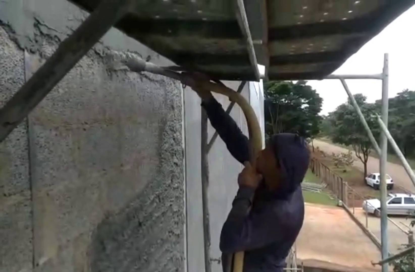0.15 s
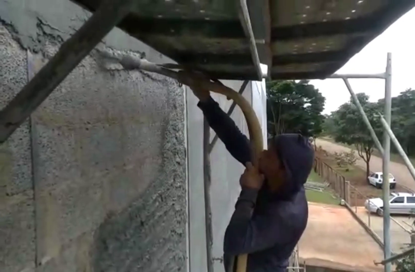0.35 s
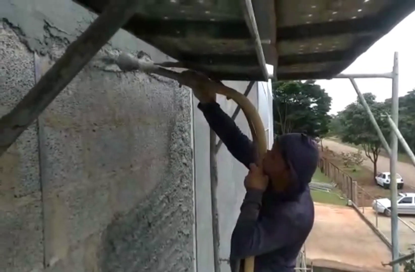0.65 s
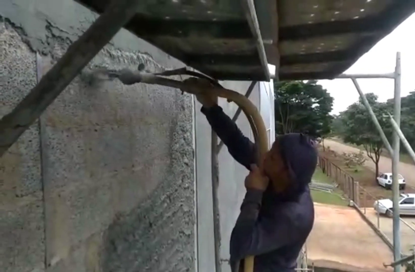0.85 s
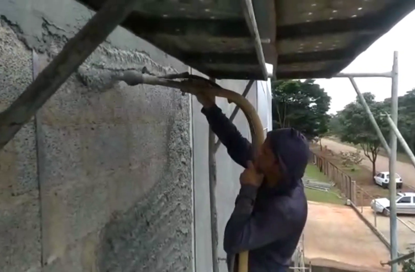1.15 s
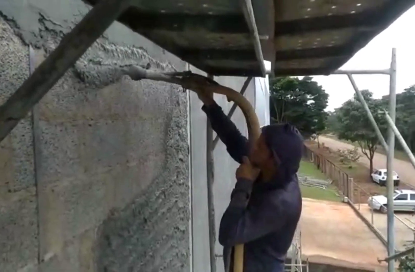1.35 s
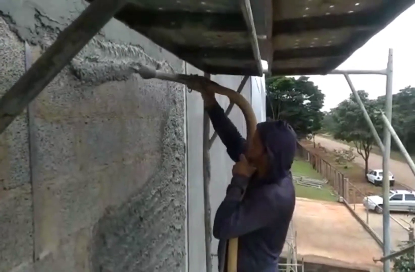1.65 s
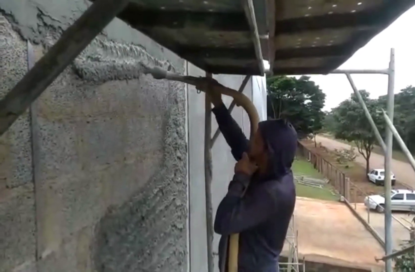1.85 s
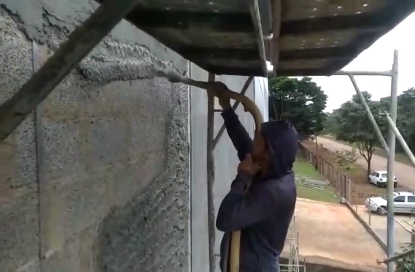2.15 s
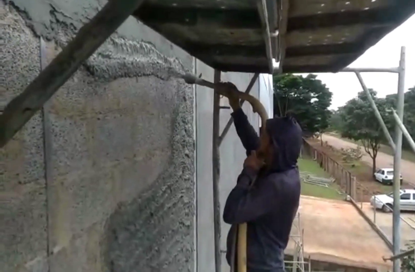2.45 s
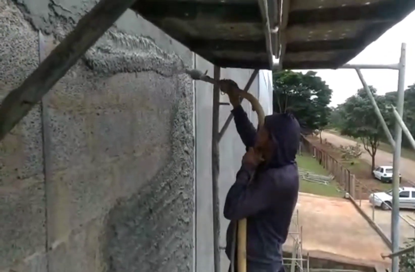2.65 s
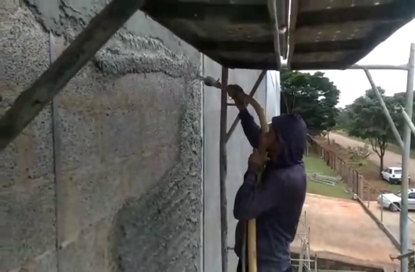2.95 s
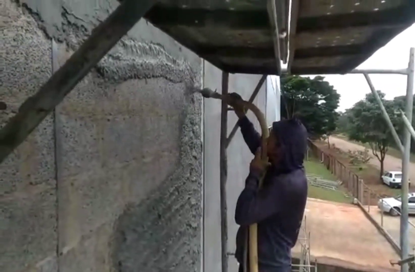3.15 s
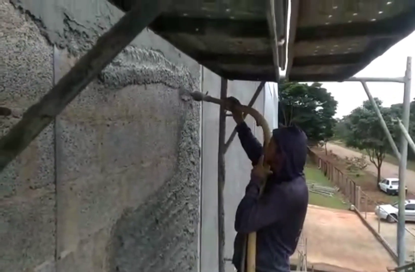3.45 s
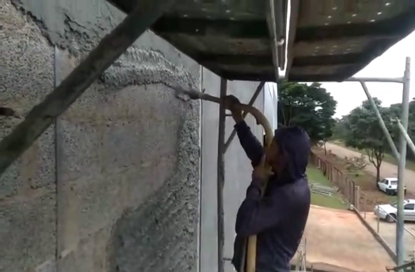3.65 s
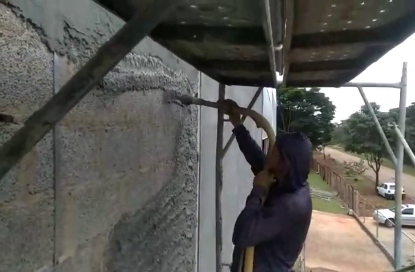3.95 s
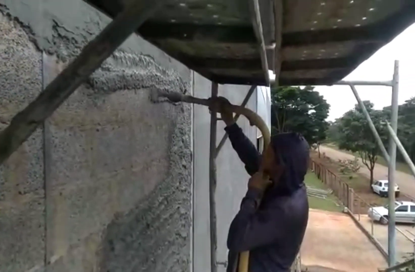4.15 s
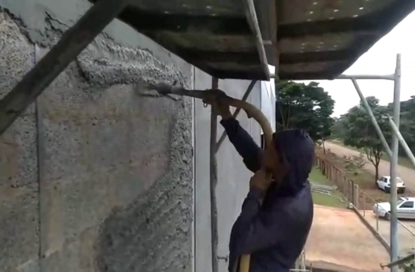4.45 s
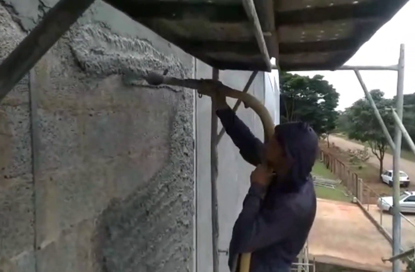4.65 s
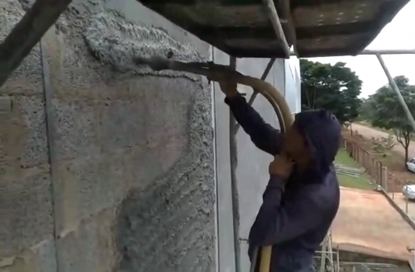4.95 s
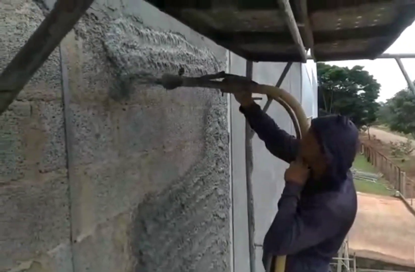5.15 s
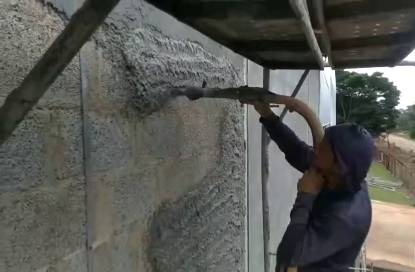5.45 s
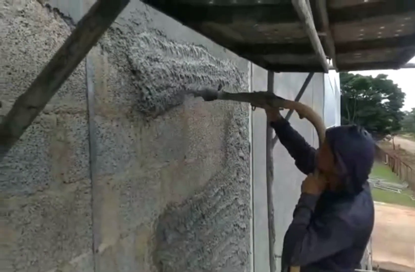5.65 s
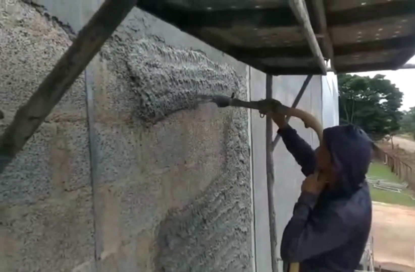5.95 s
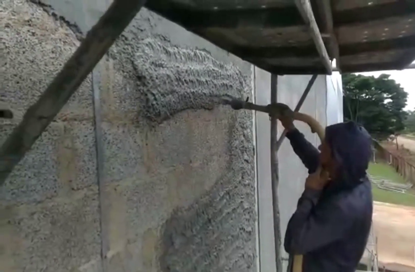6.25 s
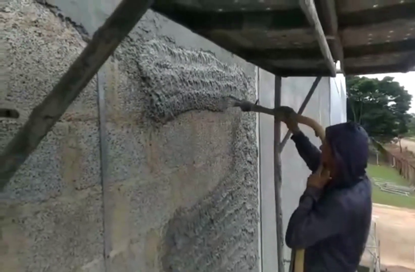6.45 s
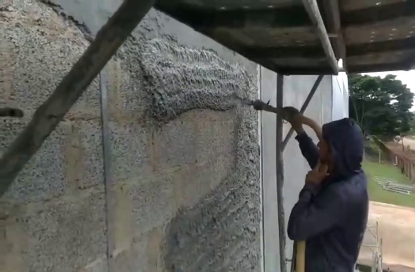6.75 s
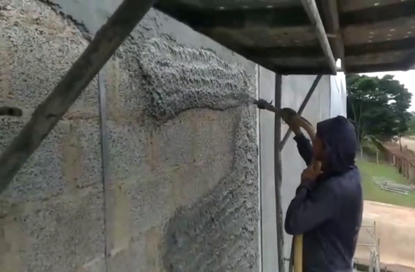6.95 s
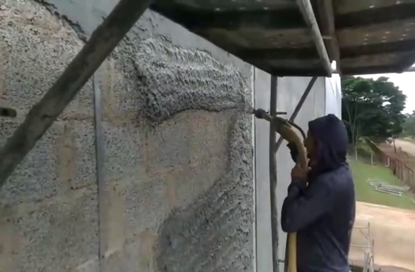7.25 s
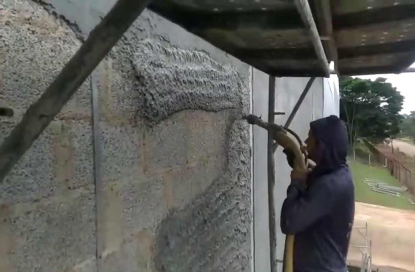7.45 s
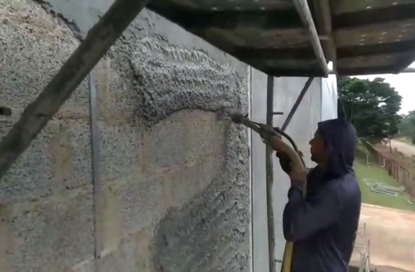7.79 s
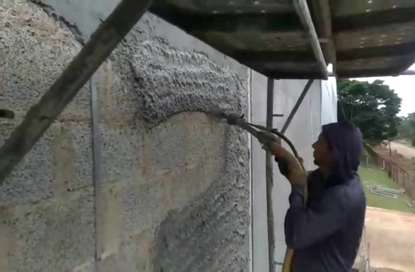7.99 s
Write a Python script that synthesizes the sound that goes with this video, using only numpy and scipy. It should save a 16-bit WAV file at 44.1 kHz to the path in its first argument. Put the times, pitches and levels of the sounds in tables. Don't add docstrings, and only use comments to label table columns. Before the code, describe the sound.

A mortar spray gun hisses harshly without pause, its bright flickering air jet knocked through by rapid hollow pops and low gurgling, outdoors and close.

```python
import sys
import numpy as np
from scipy import signal
from scipy.fft import rfft, irfft, next_fast_len
from scipy.io import wavfile
from scipy.ndimage import uniform_filter1d

SR = 44100
rng = np.random.default_rng(int(sys.argv[2]) if len(sys.argv) > 2 else 0)


def ratio(d):
    e = np.asarray(d, float) / 20
    return 10 ** e


def transcribe(signal):
    frames = np.atleast_2d(signal).T
    limited = np.clip(frames, -1, 1)
    pcm = np.round(limited * 32767).astype(np.int16)
    wavfile.write(sys.argv[1], SR, pcm)


N = 358245
T = np.arange(N) / SR
SIZE = next_fast_len(N)
HZ = np.maximum(np.arange(SIZE // 2 + 1) * SR / SIZE, 1)
HOP = SR // 2000

# time in seconds, peak level in dB.
SPITS = [(0.035, -11), (0.1092, -7), (0.1585, -16), (0.2154, -20), (0.3087, -18), (0.381, -7),
         (0.4409, -17), (0.4683, -17), (0.496, -1), (0.5252, -7), (0.6565, -1), (0.7028, -8),
         (0.7532, -13), (0.7951, -7), (0.8175, -7), (0.8415, -8), (0.9163, -12), (1.038, -3),
         (1.2022, -9), (1.3284, -11), (1.3942, -14), (1.4875, -12), (1.509, -10), (1.536, 2),
         (1.5758, -12), (1.682, -2), (1.7194, -5), (1.7509, -10), (1.9614, -4), (2.0542, -10),
         (2.1325, -3), (2.16, -5), (2.1824, -6), (2.2278, -2), (2.2613, 0), (2.2857, -22),
         (2.3371, -7), (2.4204, -9), (2.469, -5), (2.5117, -8), (2.5394, -1), (2.6868, -14),
         (2.737, -4), (2.7816, -12), (2.8933, -11), (2.9397, -11), (3.0126, -10), (3.0609, -6),
         (3.3767, -12), (3.4096, -9), (3.4366, -12), (3.5184, -15.5), (3.5603, -15), (3.6476, -14),
         (3.711, -20), (3.7514, 7), (3.8, -9), (3.8422, -4), (3.923, 1), (4.0432, -11),
         (4.0444, -15), (4.1063, -1), (4.1541, -18), (4.1811, -19), (4.2385, -6), (4.3055, -1),
              (4.3372, -9), (4.4045, -10), (4.4507, -8), (4.4983, -10), (4.5258, -12), (4.6196, -5),
              (4.6706, -12), (4.7134, 1), (4.7582, -13), (4.8495, -14), (4.873, -9), (4.9438, -13),
              (5.0221, -5), (5.0526, -5), (5.0885, 0), (5.1914, -5), (5.236, -13), (5.287, -9), (5.32, -1),
              (5.372, -11), (5.4098, -15), (5.4606, -15), (5.4886, -11), (5.557, -7), (5.577, -5),
              (5.6098, -9), (5.76, -12), (5.789, -8), (5.8293, -12), (5.9214, 1), (5.949, -7), (5.976, -11),
              (6.0937, -9), (6.2, -10), (6.2274, -6), (6.3935, -8.5), (6.426, -13), (6.5078, -13),
              (6.5347, -9), (6.5971, -11), (6.643, -15), (6.7088, -6), (6.8689, -9), (7.0835, -12),
              (7.1164, -13), (7.1553, -11), (7.1772, -12), (7.735, -16), (7.8318, 0), (7.8767, -6),
              (7.958, -8), (8.0283, -14), (8.0562, -14), (8.0867, -10)]
# time in seconds, peak level in dB.
POPS = [(0.021, -20), (0.081, -16), (0.186, -21), (0.207, -12.5), (0.257, -14.5), (0.29, -12.5),
        (0.346, -13), (0.458, -13), (0.48, -14), (0.509, -16), (0.639, -12.5), (0.781, -21),
        (0.874, -16), (0.909, -17), (0.937, -16), (1.053, -17), (1.087, -14.5), (1.143, -11),
        (1.162, -13), (1.218, -18), (1.32, -12.5), (1.347, -14.5), (1.428, -20), (1.478, -29),
        (1.5, -23), (1.527, -16), (1.552, -17), (1.67, -24), (1.734, -16), (1.76, -19), (1.819, -17),
        (1.846, -11.5), (1.888, -13.5), (1.918, -12.5), (1.955, -18), (1.991, -18), (2.112, -16),
        (2.33, -17), (2.38, -24), (2.552, -18), (2.589, -13), (2.623, -26), (2.675, -15),
        (2.766, -16), (2.793, -14), (2.862, -15.5), (3.042, -15), (3.109, -12.5), (3.171, -12),
        (3.195, -16.5), (3.354, -29), (3.401, -23), (3.447, -25), (3.603, -15), (3.687, -12),
        (3.793, -21), (3.87, -24), (3.914, -14.5), (3.981, -14), (4.054, -25),
        (4.054, -32), (4.097, -13), (4.175, -15), (4.249, -13.5), (4.296, -15), (4.375, -16),
             (4.396, -18), (4.44, -16), (4.49, -12.5), (4.519, -17), (4.549, -26), (4.594, -14.5),
             (4.693, -16), (4.752, -17), (4.819, -15.5), (4.933, -15.5), (4.989, -15), (5.065, -28),
             (5.121, -24), (5.222, -40), (5.269, -16), (5.354, -13), (5.423, -15), (5.471, -17),
             (5.567, -23), (5.598, -16), (5.637, -19), (5.771, -15), (5.814, -15), (5.851, -14),
             (5.883, -12.5), (5.908, -13), (5.989, -16), (6.057, -16), (6.185, -26), (6.236, -14.5),
             (6.282, -15), (6.377, -17), (6.412, -18), (6.494, -15.5), (6.585, -13), (6.722, -26),
             (6.799, -13.5), (6.849, -15), (6.887, -18), (6.92, -20), (7.253, -27), (7.291, -19),
             (7.407, -14), (7.475, -15.5), (7.499, -11), (7.543, -25), (7.695, -22), (7.726, -11),
             (7.777, -19), (7.823, -26), (7.861, -19), (7.89, -20), (7.945, -17.5), (8.072, -13.5)]
# time in seconds, level in dB.
PRESSURE = [(0, -24.5), (.5, -24), (1, -24), (1.5, -25), (2, -25.5), (2.5, -25), (3.1, -25.5), (3.6, -25),
            (4.2, -25), (4.8, -24), (5.3, -24), (6, -25), (6.8, -24), (7.4, -24.5), (8.12, -25)]
# time in seconds, hiss centre in Hz, left minus right level in dB.
SWEEP = [(0.0, 6080, -5.5), (0.57, 5950, -5), (0.97, 5420, -3), (1.83, 5640, -4), (2.01, 6300, -4.5),
         (3.28, 5840, -2.5), (3.39, 6460, -2.5), (4.27, 5770, -6), (4.95, 5240, -1), (5.15, 6330, -1),
         (5.43, 5830, -2), (5.7, 6540, -3), (6.04, 5520, -4.5), (7.49, 5480, -0.5), (7.67, 5830, -5),
         (7.73, 6700, -2.5), (8.05, 5640, -2), (8.12, 6400, -4.5)]
# frequency in Hz, left dB per Hz, right dB per Hz, correlation (-1 to 1).
JET_SPECTRUM = [(302, -4, -53, 0.67), (730, -11, -67, 1), (950, -4.5, -11.5, 0.31), (1340, -6, -19.5, 0.51),
                (2020, -3.5, -6, 0.32), (2085, -3.5, -14, -0.14), (2790, -4, -9, -0.53),
                (3960, -1.5, -5.5, -0.46), (4220, 2, -2.5, 0.57), (4710, -2, 3.5, -0.18),
                (7320, 0.5, 1.5, -0.02), (8020, 3, -5, 0.13), (9970, -3, -8.5, -0.075),
                (15600, -8, -23, 0.27)]
# time in seconds, lower lobe in Hz, upper lobe in Hz.
LOBES = [(0.0, 5250, 6640), (0.02, 5100, 6600), (0.77, 5340, 6700), (0.86, 5050, 6060), (1.06, 5100, 6520),
         (2.15, 5110, 6390), (2.4, 5380, 6200), (3.6, 5170, 6900), (4.16, 5000, 6100), (4.84, 4840, 6900),
         (5.25, 4640, 6660), (5.4, 5490, 6350), (5.47, 4800, 6340), (5.67, 5030, 7060), (5.99, 4940, 6410),
         (6.65, 5240, 6370), (7.3, 4860, 6700), (8.12, 5240, 6560)]
# time in seconds, level in dB.
LOAD = [(0.0, -30.5), (0.25, -31.5), (1.79, -30), (1.83, -31), (2.01, -30.5), (3.21, -32), (3.23, -32.5),
        (3.6, -30), (5.79, -32), (5.9, -29.5), (6.02, -31.5), (8.12, -30.5)]
# frequency in Hz, width in Hz, level in dB.
BARREL_MODES = [
    (117.4, 57, -8),
    (213, 86, -6),
    (371, 43, -4.5),
    (513, 82, 1.5),
    (728, 340, -6.5),
    (1126, 750, -15.5),
]
# time in seconds, factor on low modes, factor on mouth modes.
FILL = [(0, 1.006, 0.99), (1.4, 1.03, 1.06), (2.3, 1.01, 0.97), (3.3, 1.015, 1), (4, 1.013, 0.97),
        (5, 0.98, 1.02), (6, 0.95, 1.03), (7, 1.05, 0.95), (7.5, 1.05, 0.95), (8.12, 1.07, 0.98)]
# time in seconds, low mode in Hz, middle mode in Hz, upper mode in Hz.
SHEET_MODES = [(0.0, 708, 1160, 2010), (0.04, 677, 1140, 1770), (0.41, 684, 1230, 1790),
               (0.93, 690, 1145, 1900), (1.13, 720, 1270, 1720), (1.42, 698, 1160, 1900),
               (5.34, 690, 1140, 1880), (5.43, 670, 1270, 1710), (5.5, 690, 1140, 1920),
               (5.86, 670, 1100, 2000), (6.99, 665, 1190, 1920), (7.3, 665, 1190, 1650),
               (7.35, 680, 1190, 1920), (7.96, 639, 1150, 1970), (8.07, 655, 1130, 1810),
               (8.12, 676, 1230, 1980)]
# time in seconds, frequency in Hz.
POCKET = [(0, 450), (1.4, 447), (2.3, 467), (3.3, 501), (4, 490), (5, 450), (6, 460), (7, 508), (7.5, 530),
          (8.12, 496)]
# time in seconds, lag in ms.
REACH = [(0.0, 2.23), (1.3, 2.14), (2.3, 2.26), (3.3, 2.24), (4.2, 2.28), (5.0, 2.31), (6.0, 2.3),
         (7.0, 2.25), (8.12, 2.33)]
# frequency in Hz, share silent on the left, share silent on the right.
STARVED = [(2000, 0, 0), (2400, .04, .08), (3000, .05, .08), (3700, .1, .14), (4400, .06, .09),
           (5000, .04, .04), (7900, .05, .07), (8150, .45, .65), (8900, .4, .62), (9400, .33, .55),
           (11000, .25, .55), (13500, .36, .62), (14900, .42, .7), (15300, .8, .92)]
# start in seconds, length in seconds, low Hz, high Hz.
OPPOSED = [(0.18, 0.05, 3470, 3770), (0.45, 0.02, 3120, 3720), (0.59, 0.28, 3170, 3810),
           (0.96, 0.05, 3420, 3810), (1.09, 0.06, 3810, 4070), (1.14, 0.1, 3640, 3850),
           (1.33, 0.05, 3340, 3720), (1.46, 0.08, 3470, 3720), (1.6, 0.35, 3470, 3770),
           (1.76, 0.08, 3170, 3850), (2.03, 0.1, 3380, 3810), (2.3, 0.07, 3380, 3720),
           (2.33, 0.74, 3510, 3850), (2.37, 0.07, 3120, 3940), (2.44, 0.16, 3850, 3980),
           (2.5, 0.21, 2910, 3040), (2.8, 0.1, 3170, 3380), (2.97, 0.06, 2650, 2910),
           (3.01, 0.03, 3210, 3900), (3.11, 0.15, 2990, 3420), (3.16, 0.57, 3420, 3770),
           (3.23, 0.08, 2910, 3080), (3.23, 0.15, 2650, 2910), (3.26, 0.09, 3770, 3940),
           (3.4, 0.23, 3170, 3420), (3.64, 0.1, 3510, 3900), (3.79, 0.05, 3510, 3940),
           (3.84, 0.19, 3340, 3850), (3.95, 0.02, 3210, 4280), (3.96, 0.08, 3170, 3420),
           (4.17, 0.07, 2910, 3160), (4.21, 0.16, 3730, 3940), (4.3, 0.19, 3470, 3720),
           (4.49, 0.46, 3170, 3770), (4.89, 0.1, 3120, 3470), (5.09, 0.05, 3510, 3850),
           (5.09, 0.12, 3170, 3510), (5.21, 0.29, 3470, 3810), (5.79, 0.1, 3810, 4110),
           (5.83, 0.05, 4110, 4370), (6.1, 0.1, 3770, 3900), (6.18, 0.05, 2860, 3850),
           (6.18, 1.94, 3470, 3770), (6.23, 0.31, 3380, 3810), (6.45, 0.45, 3170, 3470),
           (6.47, 0.06, 2950, 3850), (6.9, 0.28, 3770, 3900), (7.45, 0.15, 3730, 3850),
           (7.6, 0.07, 3170, 3470), (7.94, 0.19, 3730, 3850)]
# start in seconds, length in seconds, low Hz, high Hz.
LAPSES = [(0.04, 0.24, 8720, 8940), (0.28, 0.42, 8330, 8940), (0.53, 0.15, 9880, 10010),
          (0.54, 0.23, 8160, 8290), (0.7, 0.02, 8980, 9800), (0.77, 0.07, 8380, 8940),
          (0.84, 0.37, 8200, 8330), (0.89, 0.14, 8680, 8810), (1.0, 0.06, 9500, 9710),
          (1.03, 0.05, 8330, 8890), (1.26, 0.09, 8550, 8940), (1.28, 0.19, 8160, 8330),
          (1.42, 0.02, 8330, 8890), (1.54, 0.16, 8250, 8630), (1.96, 0.07, 8290, 8890),
          (2.01, 0.09, 8160, 8290), (2.28, 0.06, 8120, 8460), (2.56, 0.05, 7990, 8380),
          (2.63, 0.02, 8250, 8850), (2.93, 0.02, 8200, 8980), (2.93, 0.13, 8760, 8940),
          (3.12, 0.09, 8120, 8590), (3.16, 0.12, 8380, 8720), (3.42, 0.02, 8160, 8940),
          (3.58, 0.02, 8200, 8890), (3.79, 0.07, 8510, 8890), (3.95, 0.13, 8080, 8250),
          (4.05, 0.02, 8250, 8850), (4.22, 0.2, 8120, 8290), (4.23, 0.05, 8290, 8810),
          (4.46, 0.15, 8160, 8940), (4.81, 0.09, 8250, 8980), (4.91, 0.09, 8720, 8890),
          (5.0, 0.12, 8200, 8940), (5.02, 0.02, 8940, 9710), (5.18, 0.12, 8250, 8980),
          (5.25, 0.02, 8980, 9580), (5.35, 0.09, 8200, 8510), (5.37, 0.13, 8330, 8890),
          (5.58, 0.44, 8200, 8720), (5.59, 0.21, 8720, 8940), (5.74, 0.05, 8940, 9670),
          (6.48, 0.05, 8290, 8630), (6.63, 0.14, 8200, 8380), (6.88, 0.08, 8250, 8890),
          (7.13, 0.05, 8200, 8980), (7.3, 0.05, 8120, 8550), (7.44, 0.07, 8200, 8850),
          (7.64, 0.03, 8200, 8630), (7.68, 0.38, 8250, 8890)]


def opening():
    t = T[:SR // 10]
    shape = np.exp(-t / 0.0025) - np.exp(-t / 0.0024)
    events = slugs(SPITS, top_db=-13, range_db=-2.5)
    spits = marks(events, np.maximum(events[:, 1] + 21, 0))
    chug = rms_one(resonate(rng.standard_normal(N), hz=33.3, width_hz=15.0))
    open_db = 0.68 * signal.fftconvolve(spits, shape / shape.max())[:N] + 1.5 * chug
    return open_db - uniform_filter1d(open_db, size=SR // 12)


def turbulence():
    straight_s, wall_s, wall_share = 0.00035, 0.0014, 0.16
    source, other = rng.standard_normal((2, N))
    sway = np.interp(T, T[::HOP], drift(rate_hz=7.9))
    straight = np.clip(0.2 + 0.2 * sway, 0, 0.9)
    paths = straight * np.roll(source, int(straight_s * SR))
    paths = paths + wall_share * np.roll(source, int(wall_s * SR))
    far = paths + np.sqrt(np.maximum(1 - straight ** 2 - wall_share ** 2, 0)) * other
    hz, *columns = np.transpose(JET_SPECTRUM)
    left_db, right_db, alike = [np.interp(np.log(HZ), np.log(hz), c) for c in columns]
    alike = np.clip(alike, -1, 1)
    near = rfft(source, SIZE)
    left = alike * near + np.sqrt(1 - alike ** 2) * rfft(far, SIZE)
    spectra = np.array([left * ratio(left_db), near * ratio(right_db)])
    bright = irfft(spectra.mean(axis=0) * (HZ > 4000) * (HZ < 8000))
    return spectra / np.sqrt(np.mean(bright ** 2))


def jet(open_db):
    spectra = turbulence()
    (pressure_db,), (centre_hz, pan_db), (load_db,) = in_time(PRESSURE), in_time(SWEEP), in_time(LOAD)
    hiss_db, pan_db, load_db, open_db = np.array([pressure_db, pan_db, load_db, open_db])[:, ::HOP]
    turn = np.log2(centre_hz[::HOP] / 5800)
    pan_db = pan_db - pan_db.mean()
    splatter_db = -32 + 0.96 * (load_db - load_db.mean())
    top_pan_db = 2 * drift(rate_hz=2.0)
    top_pan_db = top_pan_db - top_pan_db.mean()
    out, together = np.zeros((2, N)), drift(rate_hz=23.0)
    for step in range(3, 19):
        mid_hz = 250 * 2 ** (step / 3)
        weight = np.maximum(1 - 3 * abs(np.log2(HZ / mid_hz)), 0)
        band = irfft(spectra * weight, SIZE)[:, :N]
        apart = np.array([drift(rate_hz=22.4), drift(rate_hz=48)])
        gain_db = 0.2 * together + 2.85 * apart + 0.18 * drift(rate_hz=0.74)
        if mid_hz < 3500:
            gain_db += splatter_db + 9.0 + [[0.1], [0.25]] * open_db
        elif mid_hz < 8500:
            gain_db += hiss_db - 1.5 + [[0.35], [0.9]] * open_db
            gain_db += [[30], [70]] * (np.log2(mid_hz / 5800) * turn) - [[5.0], [25]] * turn ** 2
            gain_db += [[0.25], [-0.25]] * pan_db + [[0.2], [-0.2]]
        else:
            gain_db = 0.57 * gain_db + 0.46 * drift(rate_hz=2.6) - 17.5
            gain_db += [[0.15], [0.4]] * open_db + [[0.1], [-0.9]] * top_pan_db
        out += [np.interp(T, T[::HOP], gain) for gain in ratio(gain_db)] * band
    out = out + 0.34 * slide(out, centre_hz, width_hz=310)
    lobes = sum(slide(out, hz, width_hz=345) for hz in in_time(LOBES))
    out = out + [[0.24], [0.53]] * lobes
    return out + 0.18 * echo(out)


def barrel(open_db):
    (load_db,), (low, mouth) = in_time(LOAD), in_time(FILL)
    bubbles = (rng.random(N) < 300 / SR) * ratio(3.76 * np.minimum(rng.exponential(1, N), 4))
    gurgle = rms_one(bubbles - bubbles.mean()) + 0.73 * rng.standard_normal(N)
    events = slugs(POPS, top_db=-18, range_db=7.5)
    drive = np.array([gurgle, marks(events, ratio(events[:, 1] + 33.5))])
    rung = np.zeros((2, N))
    for k, (hz, width_hz, db) in enumerate(BARREL_MODES):
        tuning = low if k < 4 else mouth
        rung += (-1) ** k * ratio(db) * slide(drive, hz * tuning, width_hz)
    gurgle, pops = rung
    pipe = ratio(load_db - 2.5 - 1.0 * open_db) * rms_one(gurgle) + pops
    return -(pipe + [[0.45], [0.55]] * echo([pipe, pipe])) * ratio([[1.8], [-3.0]])


def sheet(gun):
    return gun + 0.41 * sum(slide(gun, hz, width_hz=73) for hz in in_time(SHEET_MODES))


def pocket(gun):
    pocket_hz, = in_time(POCKET)
    gun = gun + 0.31 * slide(gun, 1.125 * pocket_hz, width_hz=40)
    return gun - 0.85 * slide(gun, pocket_hz, width_hz=55)


def echo(x):
    lag_s = in_time(REACH)[0] / 1000

    def late(side, times):
        return np.interp((T - times * lag_s) * SR, np.arange(N), side)

    return -np.array([late(side, 0.92) + 0.47 * late(side, 2.5) for side in x])


def slugs(big, top_db, range_db):
    spacing_s, spread, clear_s = 0.034, 0.3, 0.018
    gap, depth = rng.random((400, 2)).T
    s = np.cumsum(spacing_s * (1 + spread * (2 * gap - 1)))
    distance_s = abs(s[:, None] - np.array(big)[:, 0]).min(axis=1)
    keep = (s < T[-1]) & (distance_s > clear_s)
    ordinary = np.c_[s, top_db - range_db * depth]
    return np.vstack([big, ordinary[keep]])


def marks(events, size):
    out = np.zeros(N)
    out[np.clip((np.array(events)[:, 0] * SR).astype(int), 0, N - 1)] = size
    return out


def resonator(hz, width_hz):
    r = np.exp(-np.pi * width_hz / SR)
    return np.array([1, 0, -1]) * (1 - r * r) / 2, [1, -2 * r * np.cos(2 * np.pi * hz / SR), r * r]


def resonate(x, hz, width_hz):
    return signal.lfilter(*resonator(hz, width_hz), x)


def slide(x, hz, width_hz):
    out, state = np.zeros_like(x), np.zeros((len(x), 2))
    for i in range(0, N, 2048):
        b, a = resonator(hz[i], width_hz)
        out[:, i:i + 2048], state = signal.lfilter(b, a, x[:, i:i + 2048], zi=state)
    return out


def drift(rate_hz):
    count = len(T[::HOP])
    r = np.exp(-2 * np.pi * HOP * rate_hz / SR)
    slow = signal.lfilter([1], [1, -2 * r, r * r], rng.standard_normal(2 * count))
    return rms_one(slow[count:])


def rms_one(x):
    return x / np.sqrt(np.mean(x ** 2) + 1e-20)


def in_time(rows):
    s, *columns = np.transpose(rows)
    return [np.interp(T, s, c) for c in columns]


def scene():
    open_db = opening()
    return pocket(sheet(jet(open_db) + barrel(open_db)))


def starve(x):
    hz, _, cells = signal.stft(x, SR, nperseg=2048)
    patch = np.arange(len(hz)) // 10
    power = np.add.reduceat(abs(cells) ** 2, np.arange(0, len(hz), 10), axis=1)
    level = np.log(power + 1e-20)
    luck = rng.standard_normal((3, *level.shape[1:]))
    score = uniform_filter1d(0.5 * level + 0.5 * luck[:2] + luck[2], size=3, axis=2)
    rank = score.argsort(axis=2).argsort(axis=2) / score.shape[2]
    at_hz, *shares = np.transpose(STARVED)
    share = np.array([np.interp(hz[::10] + 100, at_hz, s) for s in shares])
    keep = (rank >= share[:, :, None])[:, patch]
    return signal.istft(cells * keep, SR, nperseg=2048)[1][:, :N]


def spells(rows, hz, s):
    edge_s, edge_hz = 0.016, 50
    start, length, low, high = np.transpose(rows)[:, :, None]
    during = (s > start - edge_s) & (s < start + length + edge_s)
    inside = (hz > low - edge_hz) & (hz < high + edge_hz)
    return inside.T.astype(float) @ during > 0


def oppose(x):
    hz, s, cells = signal.stft(x, SR, nperseg=1024)
    luck = rng.random((len(hz) // 4 + 1, len(s) // 4 + 1))
    luck = np.repeat(np.repeat(luck, 4, 0), 4, 1)[:len(hz), :len(s)]
    stray = luck < 0.26 * np.exp(-((hz[:, None] - 3300) / 800) ** 2)
    cells = cells - cells.mean(axis=0) * (spells(OPPOSED, hz, s) | stray)
    cells = cells * ~spells(LAPSES, hz, s)
    return signal.istft(cells, SR, nperseg=1024)[1][:, :N]


def band_limit(x):
    return signal.sosfilt(signal.butter(12, 15430, fs=SR, output="sos"), x)


def record(dry):
    x = signal.sosfilt(signal.butter(2, 65, "high", fs=SR, output="sos"), dry)
    plate_hz, above_db = 8006, -16
    step = ratio(above_db / (1 + np.exp(-np.clip((HZ - plate_hz) / 70, -50, 50))))
    x = np.tanh(irfft(rfft(x, SIZE) * step, SIZE)[:, :N])
    mix = oppose(starve(x))
    return band_limit(mix)


dry = scene()
out = record(dry)
transcribe(out)
```